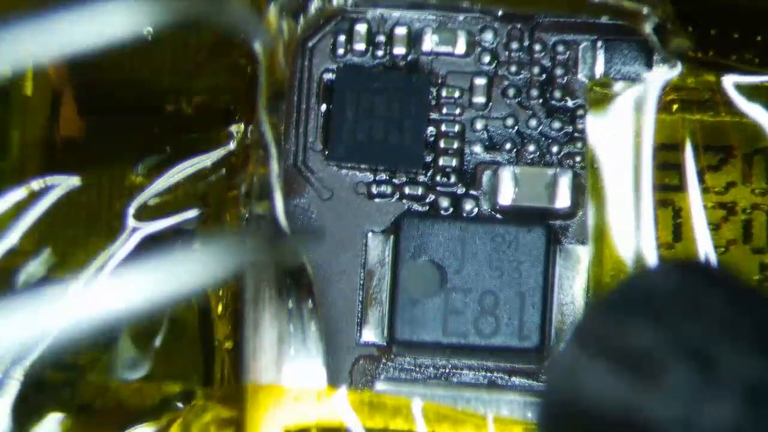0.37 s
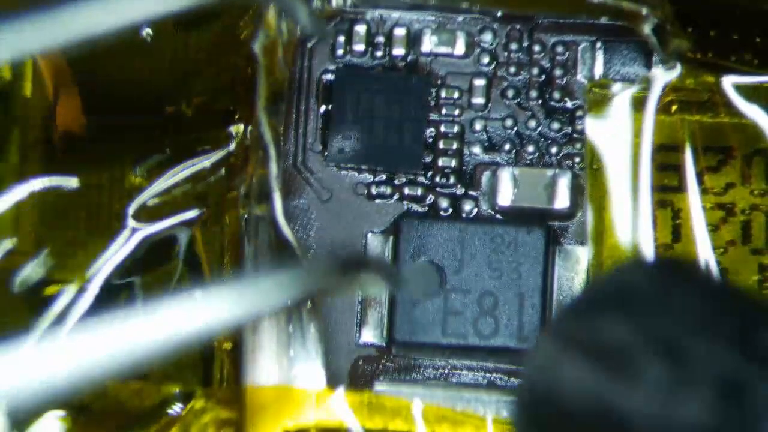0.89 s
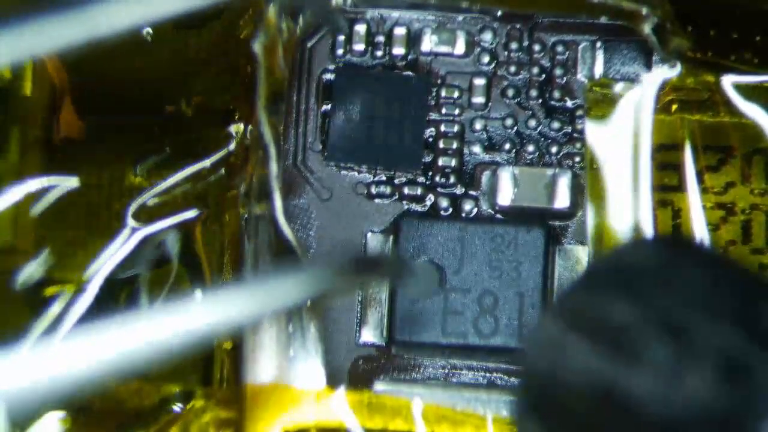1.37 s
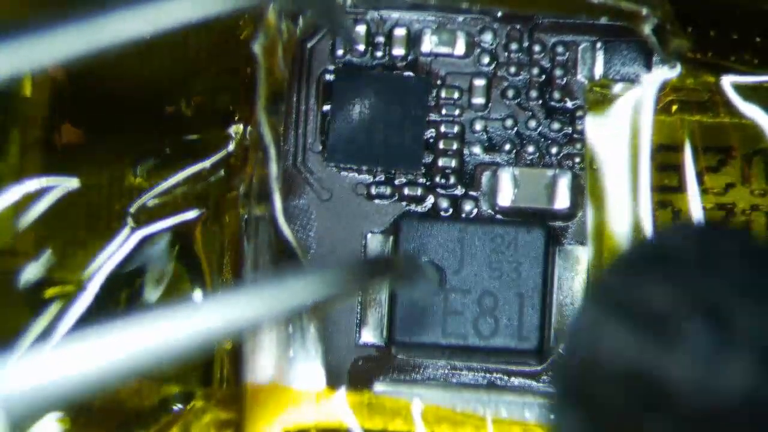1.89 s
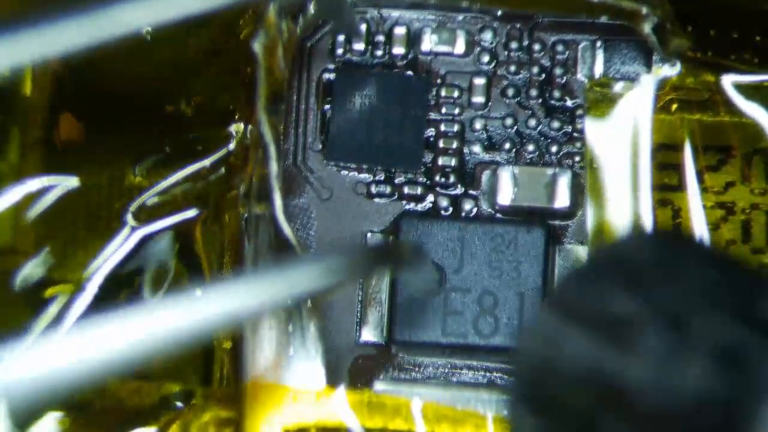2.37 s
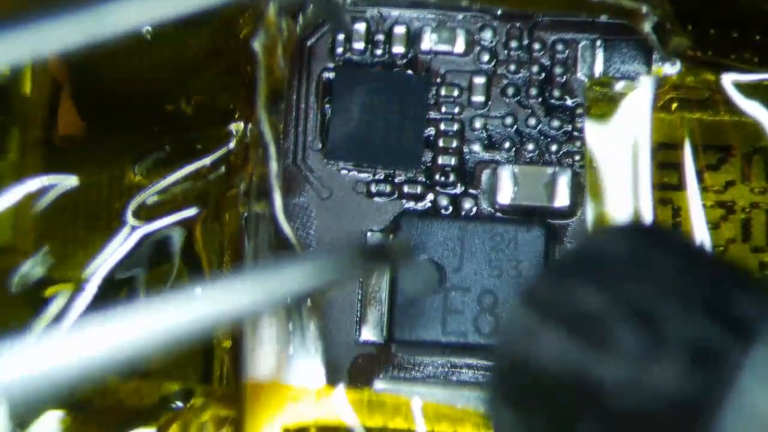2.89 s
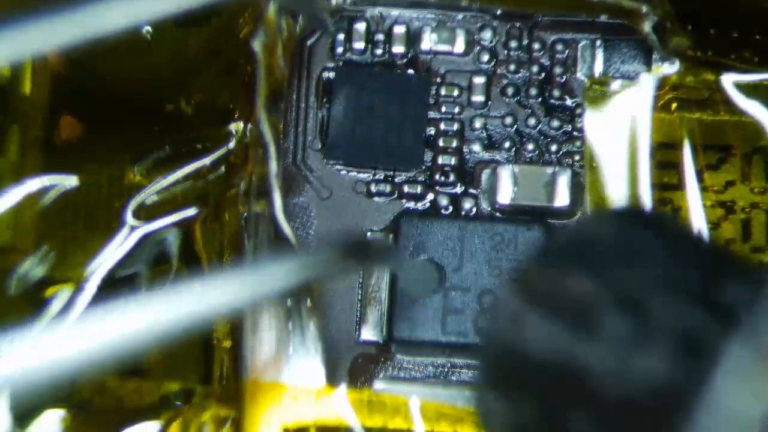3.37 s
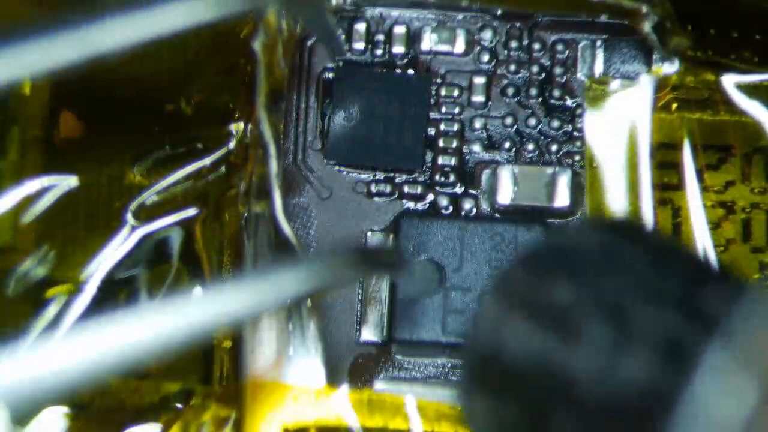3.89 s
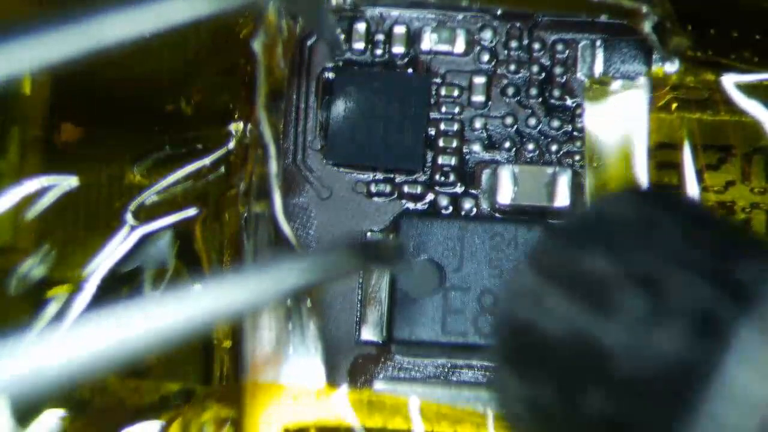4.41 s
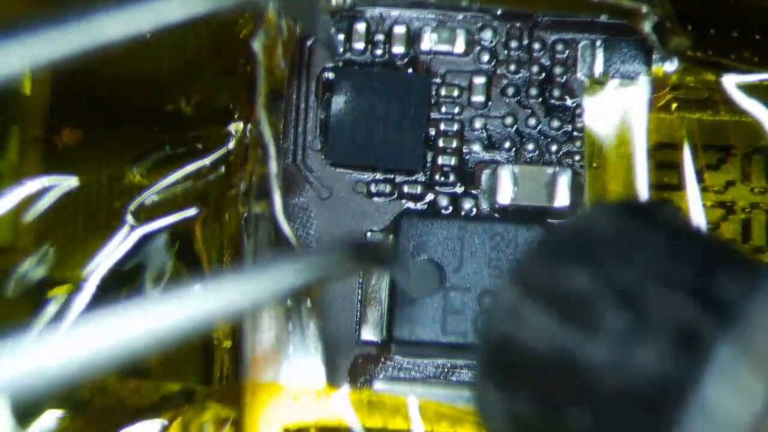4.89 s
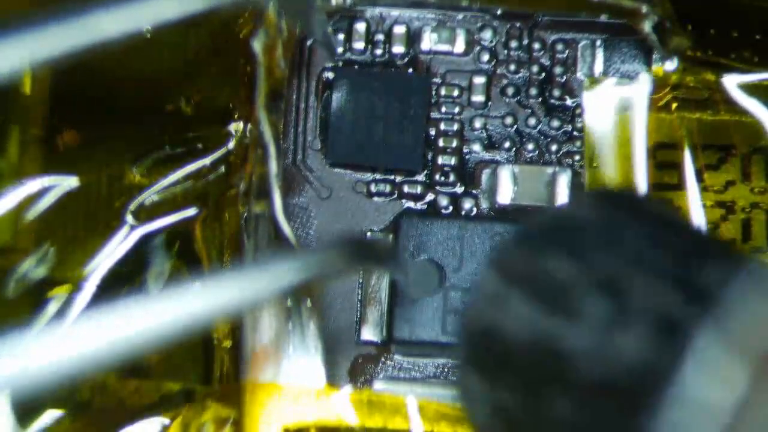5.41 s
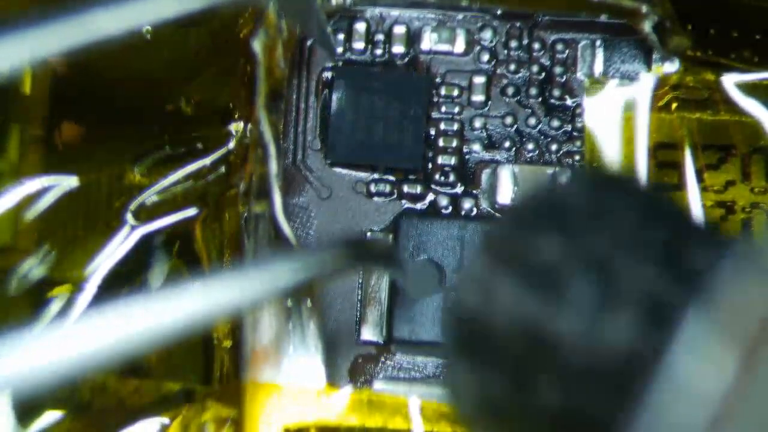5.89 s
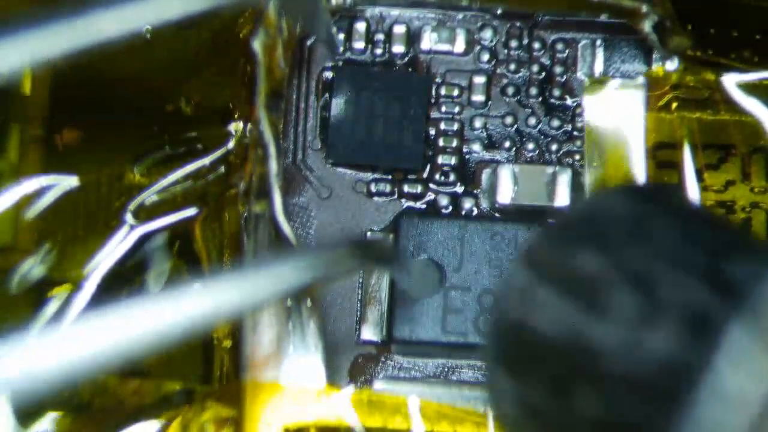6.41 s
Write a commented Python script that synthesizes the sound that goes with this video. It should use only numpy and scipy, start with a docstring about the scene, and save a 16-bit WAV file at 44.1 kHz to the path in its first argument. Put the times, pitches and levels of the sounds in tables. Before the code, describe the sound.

A hot-air nozzle blows a steady, whistly hiss over a small circuit board, dropping and wavering after three seconds, above a faint fan drone.

```python
"""At an electronics bench, hot air blows from a rework nozzle onto a circuit board.
The jet is noise through the resonances of nozzle and board, its bands swinging as the hand sways.
Behind it lie an extractor fan (lumpy noise and a duct drone) and the sines of mains and motors;
tweezers touch the board twice, as short rings. One microphone feeds both channels alike."""
import sys
import numpy as np
from scipy import signal
from scipy.fft import rfft, irfft
from scipy.io import wavfile
from scipy.ndimage import uniform_filter1d

SR = 44100
rng = np.random.default_rng(int(sys.argv[2]) if len(sys.argv) > 2 else 0)


def undo_db(level):
    """Turn decibels back into plain size, where 20 dB means ten times bigger."""
    steps = np.asarray(level, float) / 20
    return 10 ** steps


def file_out(sig):
    """Save sig as 16-bit WAV at sys.argv[1]."""
    # one column per channel
    cols = np.atleast_2d(sig).T
    # limit, then scale
    lim = np.clip(cols, -1, 1)
    pcm = np.round(lim * 32767).astype(np.int16)
    wavfile.write(sys.argv[1], SR, pcm)


N = 287973


def evened(x):
    """Scales to rms 1."""
    return x / np.sqrt(np.mean(x ** 2) + 1e-20)


def noise(gain):
    """Random short-time spectra (bins x frames), shaped by an amplitude gain and turned to sound."""
    real, imaginary = rng.standard_normal((gain.shape[1], gain.shape[0], 2)).T
    spectra = (real + 1j * imaginary) * gain
    return signal.istft(spectra, nperseg=1024, noverlap=768)[1][:N] * np.sqrt(2 / 3)


def modes_power(modes, hz, steep):
    """Summed power of resonances, each falling away steeply on both sides."""
    return sum(undo_db(db) ** 2 / (1 + (2 * (hz - f) / width) ** 2) ** steep for f, width, db in modes)


def patches(frames, wide, long):
    """A random field of rms 1 with lumps so many bins wide and frames long."""
    field = rng.standard_normal((frames, 513)).T
    return evened(uniform_filter1d(uniform_filter1d(field, wide, 0), long, 1))


def flutter(frames, long):
    """A random wavering of rms 1 with lumps so many frames long and no slow drift."""
    once = uniform_filter1d(rng.standard_normal(frames), long)
    return evened(uniform_filter1d(once, long) - uniform_filter1d(once, 6 * long))


def bumps(t, s, width):
    """One smooth hump of height 1 at each moment s, reaching zero one width away."""
    return np.cos(np.pi * np.clip((t - s[:, None]) / width[:, None], -1, 1) / 2) ** 2


def microphone_hiss():
    """The microphone's own faint white noise."""
    return undo_db(-90.3) * rng.standard_normal(N)  # dB rms


def tones():
    """Mains and motors: clean sines that drift slowly about their pitch."""
    # steady tones: (frequency [Hz], level [dB rms], drift [Hz rms])
    hums = [(59.98, -58, .03), (119.96, -94, .06), (179.9, -85.5, .1), (299.8, -100, .15),
            (1112, -72.5, .6), (3484.3, -66.5, .4), (12187, -97, 3)]
    drifts = uniform_filter1d(rng.standard_normal((len(hums), N)), SR // 4, 1)
    out = np.zeros(N)
    for (hz, db, wander_hz), drift in zip(hums, drifts):
        phase = 2 * np.pi * np.cumsum(hz + wander_hz * evened(drift)) / SR
        out += undo_db(db) * np.sqrt(2) * np.sin(phase)
    return out


def fan_rush():
    """Extractor fan and room air: low shaped noise, with lumps in time and frequency."""
    # spectrum of fan and room air: (frequency [Hz], relative density [dB per Hz])
    fan_spectrum = [(20, 0), (36, -5), (48, -2), (75, 0), (95, -6), (140, -12), (200, -12), (245, -21),
                    (290, -19), (345, -24), (440, -23), (530, -15), (640, -7), (780, -11), (1000, -12),
                    (1400, -40)]
    f, db = np.transpose(fan_spectrum)
    hz = np.fft.rfftfreq(N, 1 / SR)
    shape_db = np.interp(np.log(hz + 1), np.log(f + 1), db)
    rush = irfft(rfft(rng.standard_normal(N)) * undo_db(shape_db), N)
    bands = signal.stft(evened(rush), nperseg=2048, noverlap=1536)[2]
    lumps = rng.standard_normal(bands.shape[::-1]).T
    lumps = evened(uniform_filter1d(uniform_filter1d(lumps, 6, 0), 12, 1))
    lumps *= np.clip(np.arange(1025) / 12, 0, 1)[:, None]  # the lowest bins stay steadier
    rush = signal.istft(bands * undo_db(4.2 * lumps), nperseg=2048, noverlap=1536)[1][:N]
    return undo_db(-74) * rush  # dB rms before the lumps


def duct_drone():
    """The fan's duct drones near 1 kHz: noise through narrow resonances, throbbing in level."""
    # slow course of the drone: (time [s], level before the ripple [dB])
    drone_course = [(0.0, -62.5), (2.0, -63), (3.6, -68.5), (4.9, -65.5), (6.53, -67.5)]
    # resonances of the duct: (frequency [Hz], nominal width [Hz], relative level [dB])
    duct_modes = [(1015.5, 46, 3.5), (994, 150, -8), (1052, 183, -3), (1226, 150, -12.5)]
    frames, hz = N // 256 + 5, np.fft.rfftfreq(1024, 1 / SR)
    duct = modes_power(duct_modes, hz, 3.0)
    drone_db = np.interp(np.arange(frames) * 256 / SR, *np.transpose(drone_course))
    drone_db = drone_db + 3.44 * patches(frames, 4, 14)
    drone_db = drone_db + 1.0 * flutter(frames, long=12)  # throb, dB rms
    return noise(np.sqrt(duct / duct.sum())[:, None] * undo_db(drone_db))


def taps():
    """Tweezers touch the board: short dull rings that swell over a few cycles."""
    # touches: (time [s], level before swell, decay and doubling [dB], frequency [Hz], t60 [s])
    touches = [(5.1, -43, 1000, .003), (5.266, -43, 1650, .025)]
    out, t = np.zeros(N), np.arange(4000) / SR
    for s, db, hz, t60 in touches:
        swell = 1 - np.exp(-8 * t / t60)
        ring = undo_db(db - 60 * t / t60) * np.sin(2 * np.pi * hz * t) * swell
        out[round(s * SR):][:len(t)] += 2 * ring
    return out


def band_levels(t):
    """Jet level per band in dB: each takes its own share of the hand's slow drift and quick sways."""
    # how squarely the jet meets the board, and its sheen at the top, before each band's share:
    # (time [s], push [dB], sheen [dB])
    hand_drift = [(0.0, 4.5, 0), (0.08, 4, -11), (0.45, 4.5, 2), (.7, 3.5, -3), (0.8, 3, 7),
                  (1.32, 5.5, -5), (1.78, 6, 3), (2.02, 5.5, 0), (2.25, 4.5, -7), (2.93, -1, -1),
                  (3.03, -7.5, -1.5), (4.35, -4.5, 4), (4.69, -6.5, -3), (5.44, -7.5, -3.5),
                  (5.73, -2.5, -1), (6.04, -6, -2), (6.19, -13.5, 0), (6.53, -6, 4)]
    # quick sways of the hand, before each band's share:
    # (time [s], half-width [s], swell [dB], brightening [dB])
    hand_sways = [(2.65, 0.46, 2, -1.2), (2.96, 0.14, 2, -0.5), (3.11, 0.1, 5, 1.5), (3.26, 0.12, 7, -1.5),
                  (3.43, 0.27, 5, -0.9), (3.71, 0.11, 5.0, -0.8), (3.89, 0.24, 3, -0.3), (4.15, 0.12, 5, 0),
                  (4.3, 0.099, 6, -0.6), (4.57, 0.16, 6, 0.5), (4.73, 0.066, 2.5, -1.2),
                  (4.92, 0.16, 2, 0.4), (5.24, 0.11, 5.5, 2), (5.58, 0.068, 3.5, 1),
                  (5.76, 0.13, 2.4, -0.7), (5.89, 0.23, 2, 1.7), (6.02, 0.084, 4, 4.5),
                  (6.14, 0.1, 6.5, 0.2), (6.29, 0.11, 7.7, 2)]
    # how body, level, middle, treble, edge and air answer, one row each:
    # (rest [dB], share of push [1], of sheen [1], of swell [1], of brightening [1])
    band_answer = [(-57, .24, 0, .02, 0.58), (-45.5, 0.51, 0, 0.68, -0.31), (-52, 0.86, 0, 0.97, -0.9),
                   (-51, 0.96, 0.085, 1.03, 0.16), (-57, 1.25, 0.24, 1.85, 1.5),
                   (-88.5, 2.7, 0.91, 3.3, .3)]
    # the body hollows or fills as the jet crosses an edge: (time [s], half-width [s], change [dB])
    body_hollows = [(.33, 0.074, -2), (.74, 0.049, -1), (1.3, .1, -6), (1.58, 0.053, -4), (2.18, .06, 2),
                    (2.95, .07, 3), (3.35, .07, -3), (3.47, .08, 2), (3.87, 0.079, -7), (4.02, .07, -6),
                    (4.42, 0.11, -8), (4.69, .12, 4), (5.5, 0.063, -2), (5.8, .09, -3), (5.92, 0.082, 4.5),
                    (6.15, .06, -1), (6.35, 0.067, -4)]
    body_sag_db_per_s, body_flutter_db, air_flutter_db = -1.43, 1.44, 2.2  # flutters in rms
    s, width, swell_db, bright_db = np.transpose(hand_sways)
    at, *drift = np.transpose(hand_drift)
    sway = bumps(t, s, width)
    slow = [np.interp(t, at, course) for course in drift]
    controls = np.array([np.ones(len(t)), *slow, swell_db @ sway, bright_db @ sway])
    level_db = np.array(band_answer) @ controls
    s, width, change_db = np.transpose(body_hollows)
    level_db[0] += change_db @ bumps(t, s, width) + body_sag_db_per_s * t
    level_db[0] += body_flutter_db * flutter(len(t), long=12)
    level_db[-1] += air_flutter_db * flutter(len(t), long=12)
    return level_db


def jet():
    """Turbulent air through resonances; each band swings by its own amount as the nozzle moves."""
    # the nozzle turns away from the microphone: (time [s], share of the turned colour [0-1])
    nozzle_turn = [(0, 0.65), (1.2, 0.45), (2.2, 0.55), (2.7, 0.63), (3.0, 0.93), (4.5, 0.86), (6.53, 1)]
    # resonances, nozzle facing: (frequency [Hz], nominal width [Hz], relative level [dB])
    facing_modes = [(1510, 380, -13.5), (2050, 390, -8), (2426, 180, 17.5), (2570, 450, 7.5),
                    (2710, 240, -2.5), (2944, 240, -3), (3170, 310, -15), (3420, 640, -5.5),
                    (4010, 750, -17.5), (4440, 200, -7.5), (4786, 250, -12.5), (5374, 310, -12),
                    (6100, 770, -13), (7220, 1050, -14), (8090, 770, -3.5), (8800, 220, -15),
                    (9580, 760, -1), (9650, 85, -36), (10850, 360, -16), (11500, 550, -23),
                    (11500, 250, -57)]
    # resonances, nozzle turned: (frequency [Hz], nominal width [Hz], relative level [dB])
    turned_modes = [(1631, 340, -20), (1870, 310, -16), (2510, 83, -0.5), (2750, 332, 5), (3014, 300, 2),
                    (3457, 450, 1.5), (3930, 540, -4.5), (4380, 290, -8.5), (4748, 470, 0), (5485, 150, -3),
                    (6112, 520, -4), (7300, 300, -15), (7583, 710, -6.5), (8080, 790, -7), (8800, 160, -27),
                    (9410, 450, -14), (10243, 330, -13.5), (11040, 290, -31)]
    # resonances of the airy top: (frequency [Hz], nominal width [Hz], relative level [dB])
    airy_modes = [(13750, 200, -38), (14120, 280, -31), (15000, 150, -40), (15400, 280, -38)]
    # body, level, middle, treble, edge, air: (low [Hz], high [Hz], centre of action [Hz])
    jet_bands = [(1300, 2150, 1900), (2200, 3900, 2600), (3900, 6900, 5200), (6900, 8900, 7900),
                 (8900, 11500, 10200), (13400, 15700, 14000)]
    frames, hz = N // 256 + 5, np.fft.rfftfreq(1024, 1 / SR)
    t = np.arange(frames) * 256 / SR
    turn = np.clip(np.interp(t, *np.transpose(nozzle_turn)), 0, 1)
    facing = modes_power(facing_modes + airy_modes, hz, 2.2)
    turned = modes_power(turned_modes + airy_modes, hz, 2.53)
    colour_db = 10 * (np.outer(np.log10(facing), 1 - turn) + np.outer(np.log10(turned), turn))
    wanted_db = band_levels(t)
    given_db = [10 * np.log10((undo_db(colour_db[(hz > lo) & (hz < hi)]) ** 2).sum(0))
                for lo, hi, _ in jet_bands]
    centres = np.log(np.transpose(jet_bands)[2])
    # corrections ease from one band's centre to the next
    shares = np.array([np.interp(np.log(hz + 1), centres, row) for row in np.eye(len(jet_bands))])
    eddies_db = 1.56 * patches(frames, 16, 12)
    eddies_db = eddies_db + 0.96 * patches(frames, 160, 3) * shares[3:].sum(0)[:, None]  # treble up
    eddies_db = eddies_db + 1.0 * patches(frames, 3, 60)  # narrow streaks that linger
    thin = 1 / np.sqrt(1 + (900 / (hz[:, None] + 1)) ** 8)  # a small nozzle radiates no bass
    return noise(thin * undo_db(colour_db + shares.T @ (wanted_db - given_db) + eddies_db))


def scene():
    """All sources, alike in both channels."""
    return np.tile(fan_rush() + duct_drone() + tones() + taps() + jet(), (2, 1))


def low_mid_holes(x):
    """Faint low-mid sound drops out where it lies far under the loud hiss."""
    # (low edge [Hz], high edge [Hz], threshold against the mean power of all bins [dB])
    holes_range = (240, 540, -27.3)
    low_hz, high_hz, depth_db = holes_range
    hz, _, z = signal.stft(x, SR, nperseg=2048, noverlap=1536)
    power = uniform_filter1d(abs(z) ** 2, 3, -1)
    local = uniform_filter1d(power, 4, -2)
    over_db = 10 * np.log10(local / power.mean(-2, keepdims=True) + 1e-20) - depth_db
    inside = ((hz > low_hz) & (hz < high_hz))[:, None]
    cut_db = np.clip(6 * over_db, -25, 0) * inside
    return signal.istft(z * undo_db(cut_db), SR, nperseg=2048, noverlap=1536)[1][..., :N]


def low_pass(x):
    """Removes everything above the highest recorded frequency."""
    return signal.sosfilt(signal.butter(12, 15740, fs=SR, output="sos"), x)


def record(dry):
    """Adds the microphone's hiss and lets faint low-mid sound drop out, for the finished mix."""
    mix = low_mid_holes(dry + microphone_hiss())
    return low_pass(mix)


dry = scene()
out = record(dry)
file_out(out)
```